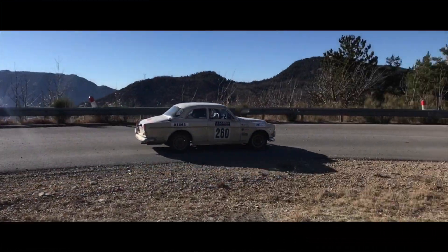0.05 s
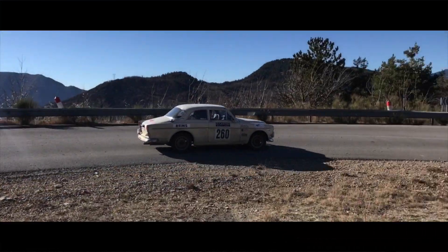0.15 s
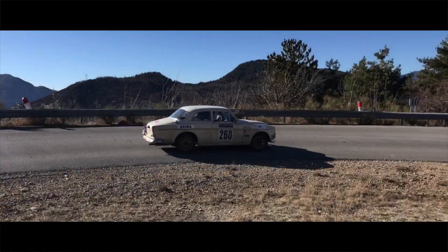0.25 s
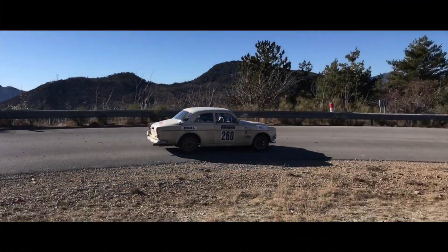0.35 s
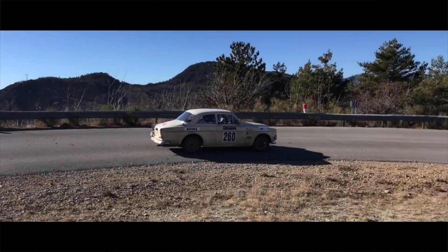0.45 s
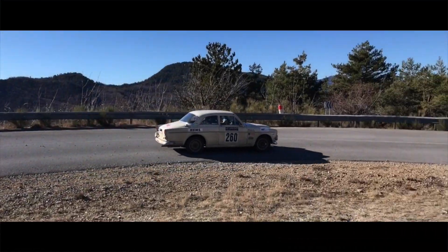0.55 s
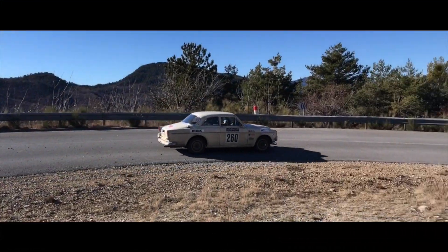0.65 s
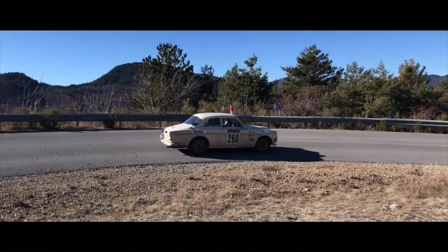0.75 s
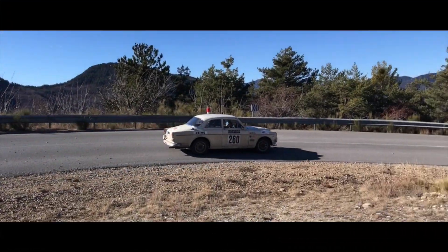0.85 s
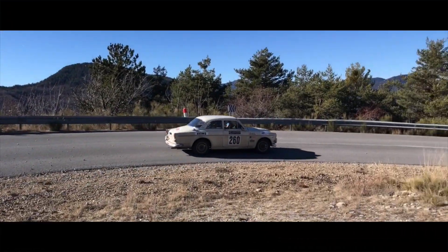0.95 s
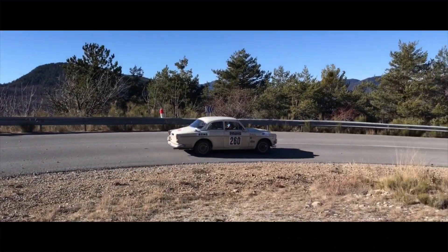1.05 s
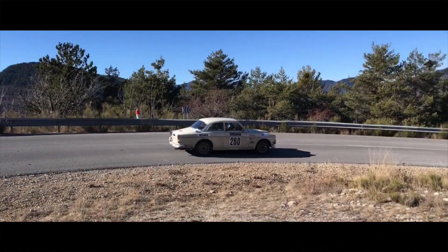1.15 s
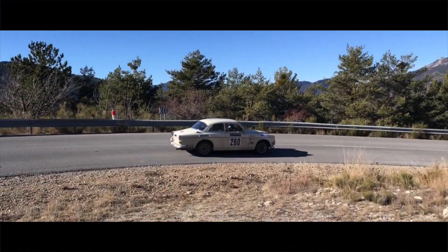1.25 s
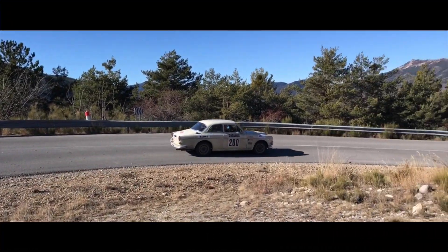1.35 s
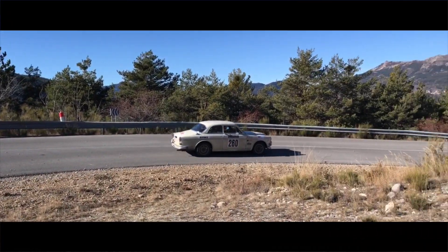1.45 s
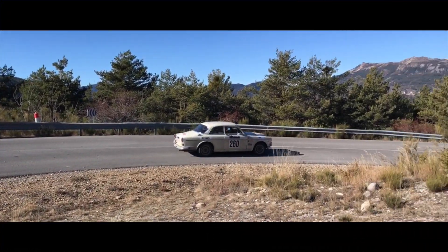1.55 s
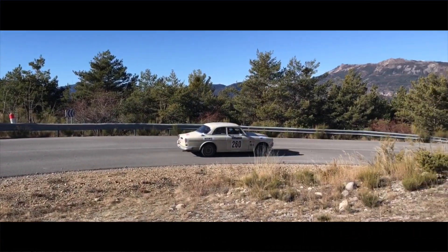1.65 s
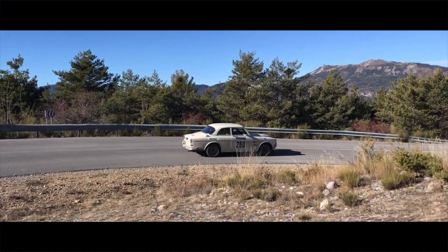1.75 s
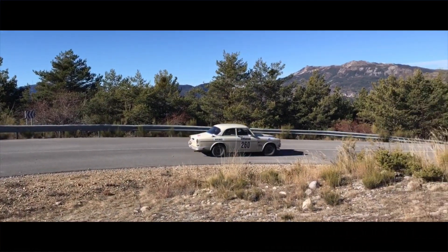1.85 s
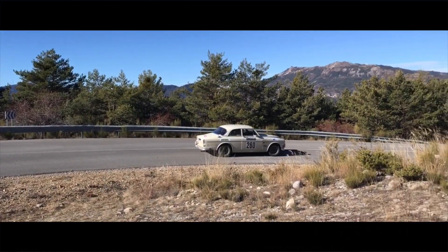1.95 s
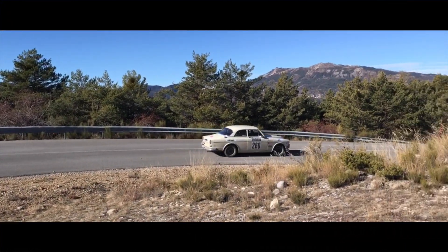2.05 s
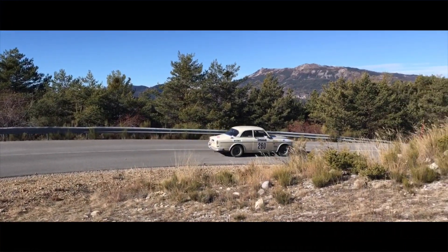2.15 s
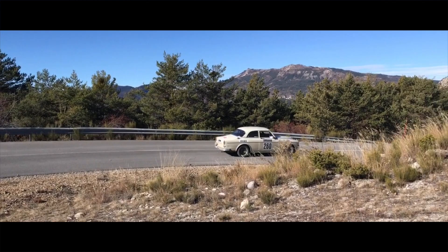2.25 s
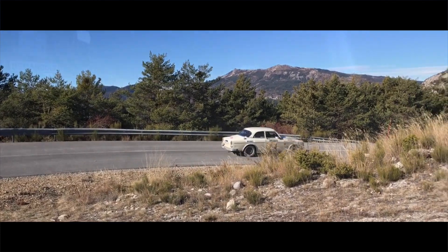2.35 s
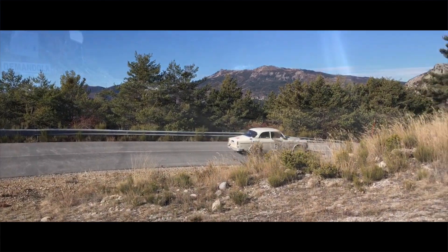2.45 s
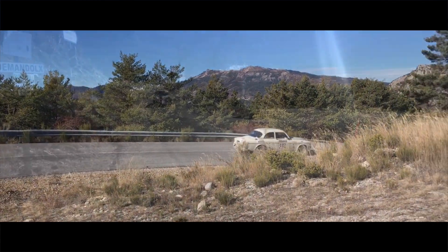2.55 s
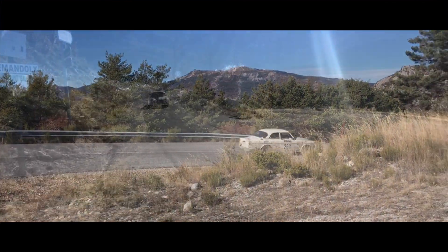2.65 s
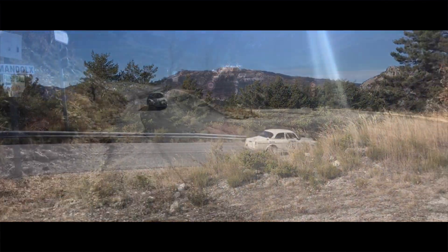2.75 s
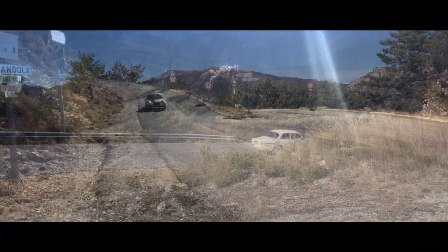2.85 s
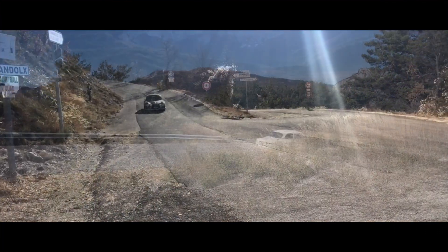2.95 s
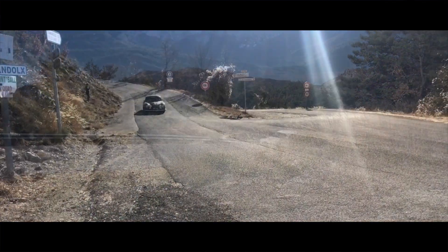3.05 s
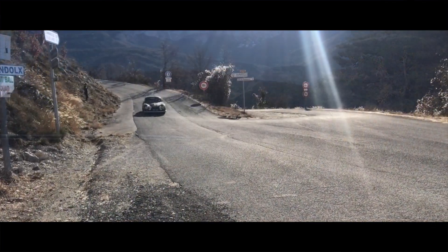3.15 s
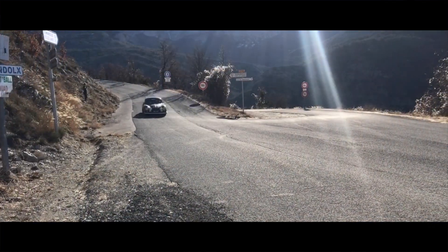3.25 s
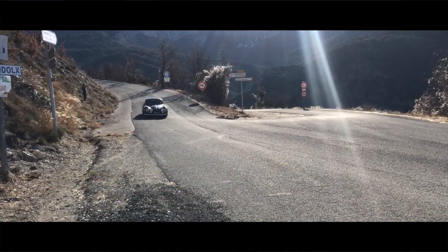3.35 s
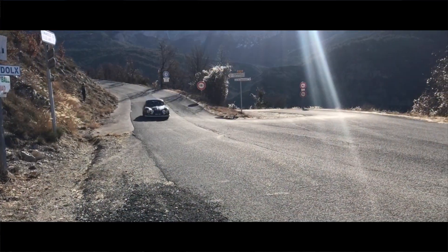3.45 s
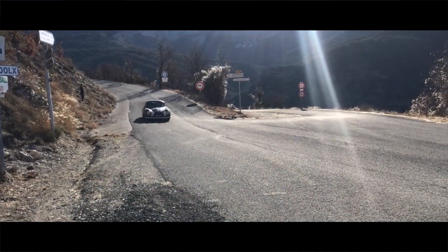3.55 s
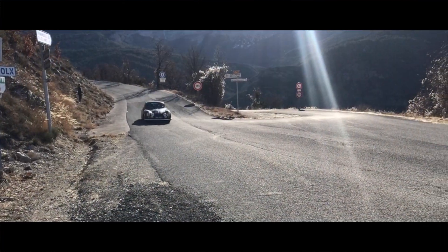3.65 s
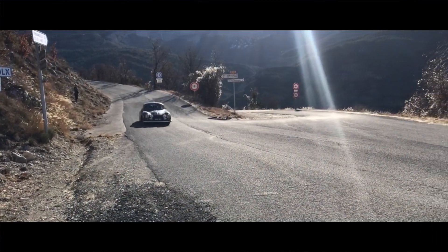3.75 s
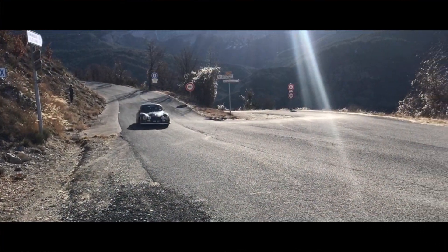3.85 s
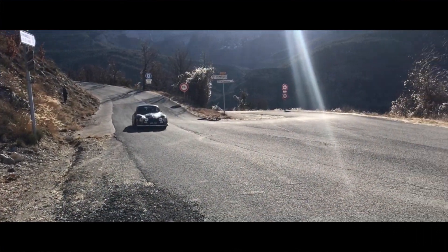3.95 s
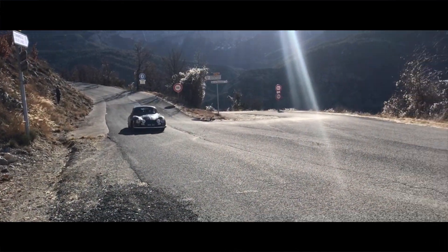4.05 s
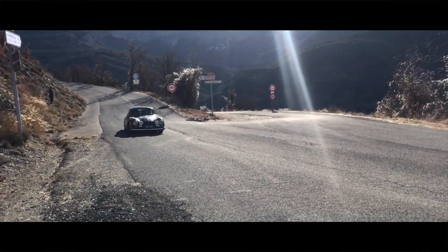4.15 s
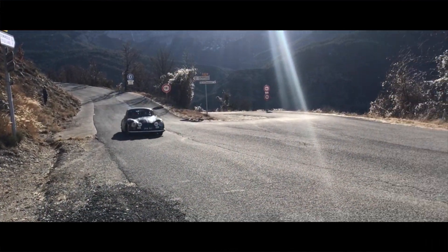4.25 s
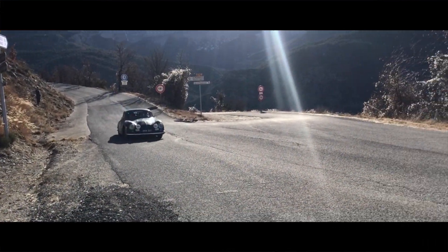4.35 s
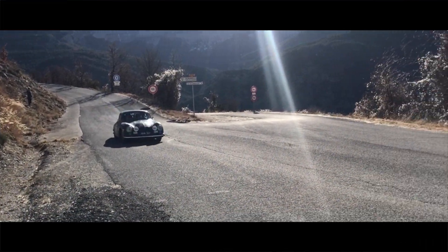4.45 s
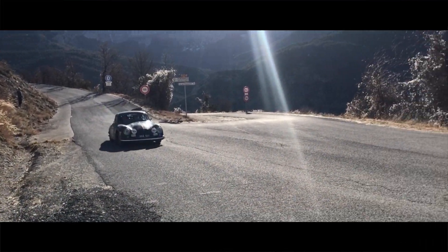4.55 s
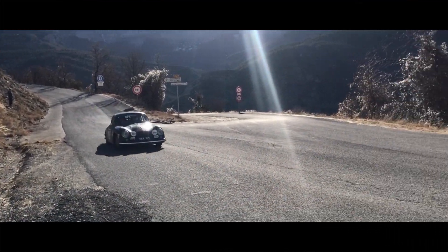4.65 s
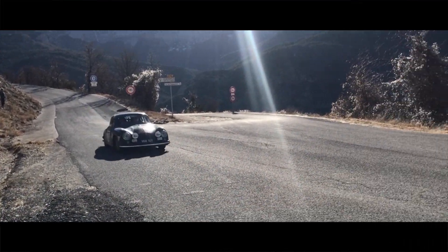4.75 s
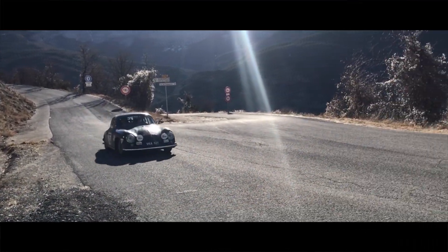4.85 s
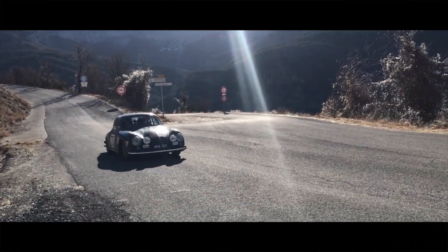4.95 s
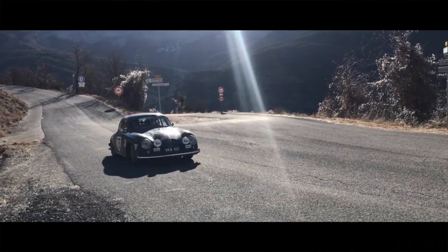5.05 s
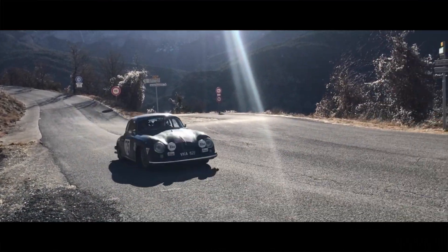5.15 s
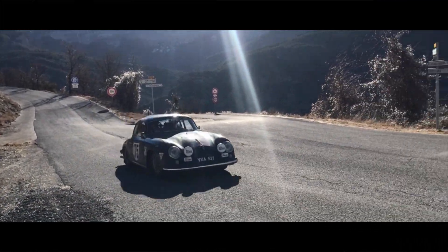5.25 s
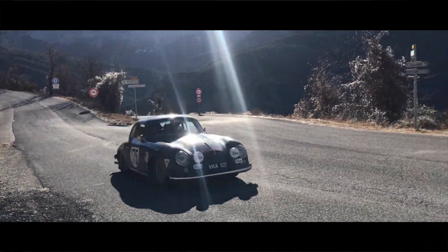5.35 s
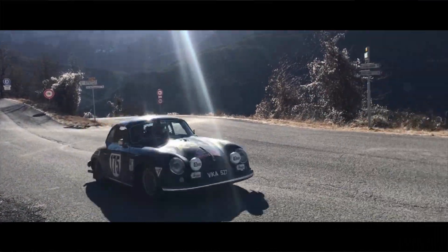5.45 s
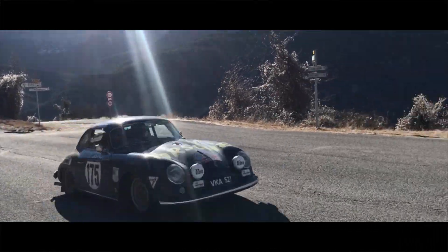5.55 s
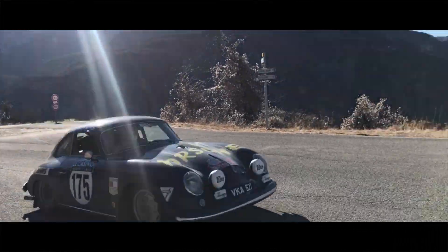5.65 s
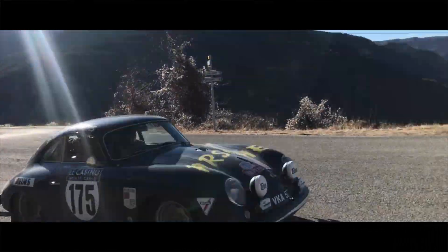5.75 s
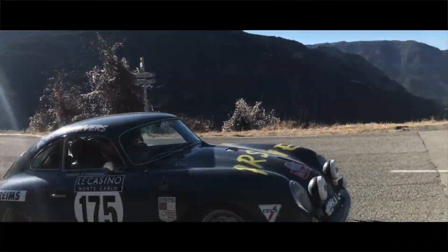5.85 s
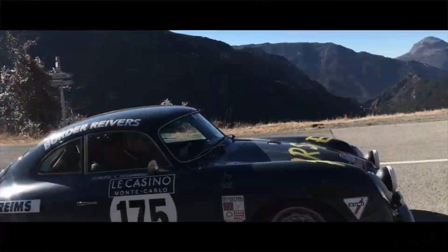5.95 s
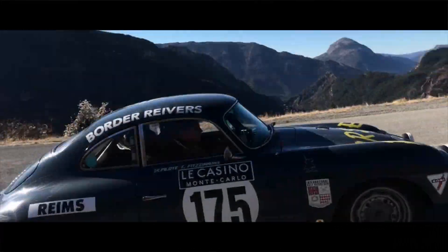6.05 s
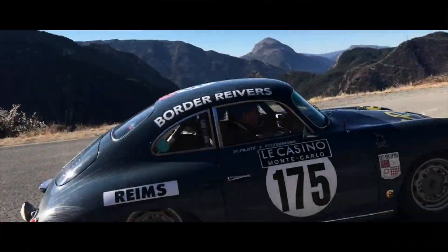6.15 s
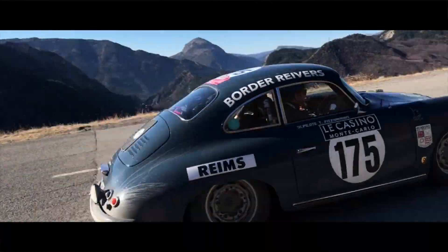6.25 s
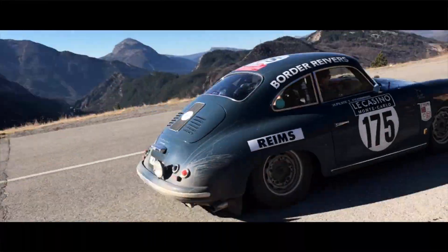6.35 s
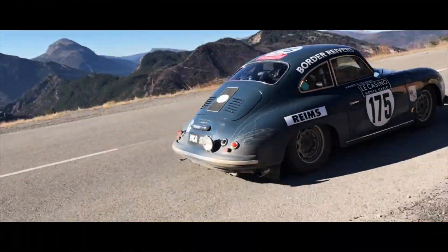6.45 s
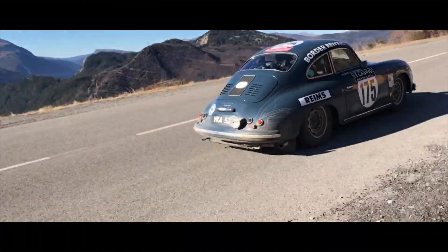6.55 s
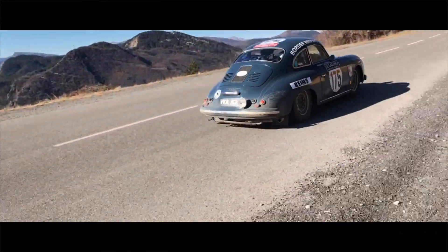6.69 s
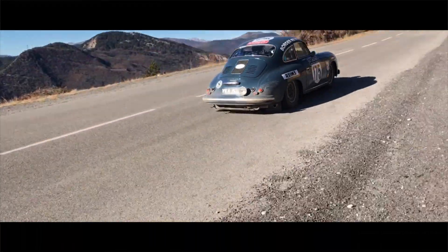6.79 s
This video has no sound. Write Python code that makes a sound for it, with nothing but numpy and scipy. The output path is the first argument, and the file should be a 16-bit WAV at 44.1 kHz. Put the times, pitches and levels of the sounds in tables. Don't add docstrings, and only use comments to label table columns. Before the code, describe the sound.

Open mountain roadside, mono phone microphone with softened treble. At 0 s a handling knock and gritty crunch sit over a close old four-cylinder engine, a deep boom around 60 Hz with rumbling tyres. Dull stone taps strike at 0.1, 0.2, 0.37 and 0.5 s; the engine stumbles with low, rising burbles until about 1.1 s. It then pulls steadily, pitch creeping up, with thin high squeaks, and fades from 2.1 to 3 s, a tiny brake squeal near 2.5. A second car coasts faintly at a lower rate, blips its throttle upward at 3.7-3.95 s, then drones steadily. Dry grit snaps, thickest at 4.1-4.45 s. A short intake hoot comes at 5.1 s. The car swells to a loud pass around 5.9-6.2 s, tyres roaring, gear whine sinking slightly, then departs with pulsing, hollow tailpipe rasp, still audible when it stops at 6.8 s.

```python
import sys
import numpy as np
from scipy import signal
from scipy.fft import rfft, irfft, next_fast_len
from scipy.io import wavfile
from scipy.ndimage import uniform_filter1d

SR = 44100
rng = np.random.default_rng(int(sys.argv[2]) if len(sys.argv) > 2 else 0)


def log_audio(samples):
    frames = np.atleast_2d(samples).T
    limited = np.clip(frames, -1, 1)
    pcm = np.round(limited * 32767).astype(np.int16)
    wavfile.write(sys.argv[1], SR, pcm)


def gain_from_decibels(decibels):
    exponent = np.asarray(decibels, float) / 20
    return 10 ** exponent


N = 300762
PADDED = next_fast_len(N)

# frequency in Hz, density in dB per Hz.
RUMBLE_COLOUR = [(20, -18.5), (40, 1.5), (90, -4.5), (150, -12), (200, -10), (265, -20), (340, -13),
                 (420, -22.5), (520, -62.5)]
# frequency in Hz, density in dB per Hz.
TYRE_COLOURS = [
    [(250, -37), (420, 1.5), (842, 1.8), (950, -0.5), (1090, 0), (1520, -10), (2500, -10.5), (3540, -14.5),
     (4780, -27), (5570, -17.5), (10300, -18.5), (13000, -16.5), (15600, -33.5)],
    [(250, -7), (420, -6.5), (543, -5.5), (735, -3), (1050, -7), (1500, -10.5), (1900, -11), (2860, -16.5),
     (4240, -29.5), (4930, -39), (11500, -39.5), (15600, -42)],
    [(250, -12), (420, -0.5), (543, -10), (735, -3.5), (1390, -12.5), (1560, -14), (2050, -17), (2860, -19),
     (4240, -25.5), (4930, -35.5), (11500, -32), (15600, -36)],
    [(250, -26), (420, 2), (446, 2), (467, 4), (577, -1.5), (702, -0.5), (1020, -1), (1250, -5),
     (1450, -11.5), (1790, -15), (2700, -17), (3400, -20.5), (5910, -35), (9030, -32.5), (10500, -32),
     (11700, -32), (13000, -39), (15600, -41)],
    [(250, -38), (420, -18), (671, 7), (792, 6), (936, 11), (1320, -2), (1470, -7.5), (3090, -14),
     (5570, -34), (8630, -22), (10300, -36), (13000, -28), (15600, -32)],
]
# time in seconds, view (0 far, 1 descent, 2 passing, 3 leaving).
ROAD_VIEW = [(3.55, 0), (3.95, 1), (4.3, 1), (5.3, 2), (6.3, 2), (6.45, 3)]
# time in seconds, rumble over roar in dB, rasp depth from 0 to 1.
RUMBLE_AND_RASP = [(0, 12, .2), (.4, 8, .2), (.7, -8, .2), (1.05, 11, .2), (1.3, 5, .2), (2.65, 0, .2),
                   (3.0, 11, .1), (3.9, 10, .13), (4.4, 6, .15), (5.8, 6, .25), (6.35, 5, .3),
                   (6.55, 3, .65)]
# time in seconds, level in dB.
SALOON_NEARNESS = [(0, 3.5), (.1, -1.5), (.9, -2), (1.6, -3), (2.12, -4), (2.25, -7.5), (2.38, -13),
                   (2.58, -20), (3.1, -38)]
# time in seconds, level in dB.
COUPE_NEARNESS = [(2.4, -58), (2.8, -30), (3.25, -21), (4.3, -14), (5.0, -9.5), (5.4, -5), (5.85, -0.5),
                  (6.25, -2.5), (6.82, -6.5)]
# change of roar, whoosh and hiss in dB per dB of nearness.
AIR_FOLLOW = [
    (.5, 0.91, 0.69),
    (1.2, 1.023, 1.53),
]
# roar in dB, whoosh in dB, hiss in dB.
SALOON_NOISE_DB = [
    (-47, -41.5, -55.5),
    (-44.5, -46, -56),
    (-44, -45, -57),
]
# roar in dB, whoosh in dB, hiss in dB.
COUPE_NOISE_DB = [
    (-28.5, -35.5, -47),
    (-28, -34, -46.5),
    (-28.5, -35.5, -45.5),
    (-30.5, -35, -40.5),
    (-43, -32, -42.5),
]
# gain of roar, whoosh and hiss in dB per unit of rasp.
RASP_LIFT_DB = (8, -2, 7.5)
# roar in dB, whoosh in dB, hiss in dB.
VALLEY_DB = (-50.5, -75, -74)
# time in seconds, frequency in Hz, depth from 0 to 1.
ASPHALT_DIP = [(6.3, 900, 0), (6.45, 999, 0.6), (6.57, 1170, .75), (6.7, 1310, .6), (6.82, 1370, .5)]

# start in seconds, end in seconds, frequency in Hz, width in Hz, level in dB, flicker in
# dB.
ROAR_SWELLS = [(0.88, 2.14, 823, 89, -51.5, 1.4), (1.9, 2.75, 600, 85, -56.5, 1.5),
               (2.95, 3.64, 1047, 104, -55, 1.5), (3.5, 3.7, 1850, 188, -66, 1.5),
               (3.1, 3.55, 327, 48, -48.5, 2.3), (3.85, 4.1, 3000, 300, -58, 1.5),
               (4.05, 4.3, 357, 13, -42.5, 1.5), (6.0, 6.55, 3214, 1200, -48, 2.5),
               (6.05, 6.55, 1225, 160, -43.5, 2.3), (.05, .9, 1350, 230, -56, 1.5),
               (6.3, 6.8, 5300, 990, -57, 1.5), (4.4, 6, 810, 130, -50, 1.5),
               (5.75, 6.55, 2940, 1000, -44, 2.8), (5.68, 6.18, 1120, 200, -41.5, 2.3),
               (6.35, 6.82, 480, 150, -46, 2), (3.55, 3.95, 335, 24, -49, 2), (3.6, 3.95, 435, 24, -52, 2),
               (6.15, 6.55, 573, 76, -39.5, 2.54), (5.75, 6.3, 11500, 730, -65, 1.45),
               (5.3, 6.2, 12000, 439, -71, 1.5), (1.3, 2.37, 7140, 400, -66, 1.5),
               (1.88, 2.25, 11500, 2500, -60, 1.5), (1.95, 2.2, 6700, 400, -63, 2.5),
               (0, 2.2, 576, 180, -58, 1.5), (6.15, 6.5, 13600, 1600, -57, 1.5),
               (6.1, 6.5, 900, 250, -43, 2), (0.5, 2.3, 14900, 1200, -71, 1.5)]
# start in seconds, end in seconds, frequency in Hz, width in Hz,
# level in dB, flicker in dB.
SQUEAK_BANDS = [
    (1.2, 2.3, 7430, 200, -70, 3),
    (1.0, 2.3, 13350, 160, -68.5, 3),
    (.1, 1.6, 5600, 400, -66, 3),
]
# time in seconds, frequency in Hz, level in dB.
BRAKE_SQUEAL = [
    (2.3, 4890, -90),
    (2.4, 4900, -79.5),
    (2.52, 4750, -77),
    (2.62, 4760, -97),
]
# time in seconds, frequency in Hz, level in dB.
GEAR_WHINE = [
    (5.5, 577, -58),
    (5.7, 567.3, -43),
    (5.9, 561, -45),
    (6.15, 549, -44),
    (6.35, 539, -44),
    (6.55, 533.6, -58),
]
# time in seconds, frequency in Hz, level in dB.
INTAKE_HOOT = [
    (5.03, 212.3, -32),
    (5.07, 250, -31),
    (5.1, 278.2, -26.5),
    (5.14, 291.3, -29.5),
    (5.18, 275, -31.5),
    (5.23, 250, -33),
]

# time in seconds, peak below 8 kHz in dB, peak above in dB.
GRIT_TICKS = [(0.0184, -40, -41), (0.2424, -45, -52), (0.2844, -38, -59), (2.6031, -64, -55),
              (2.632, -62, -53), (2.677, -64, -59), (2.9762, -64, -59), (3.5145, -55, -66),
              (3.405, -58, -68), (3.415, -60, -69), (4.2225, -46, -46), (4.2405, -48, -50),
              (4.2655, -44, -50), (4.3182, -50, -50), (4.326, -52, -52), (4.347, -53, -60),
              (4.409, -58, -50), (2.757, -48, -43), (3.088, -44, -49), (3.1323, -51, -63),
              (3.3777, -56, -69), (3.53, -43, -66), (3.5577, -37, -51), (3.5923, -43, -60),
              (3.8202, -49, -64.5), (3.8457, -60, -46.5), (4.1404, -54, -45), (4.2183, -48, -48),
              (4.2308, -43, -41), (4.2514, -35, -31), (4.2614, -48, -50), (4.3704, -61, -59),
              (4.4032, -39, -30), (4.4128, -43, -50), (4.4234, -55, -56), (4.7122, -41, -54),
              (6.3384, -41, -28)]
# time in seconds, length in seconds, level in dB.
GRIT_CRUNCHES = [(0.01, 0.026, -43.5), (0.558, .015, -64), (0.591, 0.027, -43), (3.395, .03, -68.5),
                 (3.765, .025, -68), (3.838, .015, -55.5), (4.158, 0.097, -60), (4.211, 0.022, -53),
                 (4.238, 0.033, -52), (4.225, 0.065, -60), (4.315, .016, -58), (4.4, 0.017, -62),
                 (6.335, 0.015, -43)]
# time in seconds, peak in dB, ring in Hz.
STONE_HITS = [
    (0.108, -17.5, 1100),
    (0.192, -29, 1250),
    (0.372, -13, 1100),
    (0.513, -15, 1340),
    (1.165, -32, 853),
]
# time in seconds, level in dB.
HOUSING_KNOCKS = [
    (0.0195, -9),
    (0.0212, 2.5),
    (0.036, -8.5),
    (0.06, -15),
]
# frequency in Hz, level in dB, 60 dB decay in seconds.
HOUSING_MODES = [
    (132, 2, 0.013),
    (250, -23, 0.02),
    (370, -21, 0.034),
    (596, -16.5, 0.023),
    (780, -19.5, 0.028),
    (1170, -27.5, 0.025),
    (2830, -27, 0.0065),
]

# time in seconds, peak in dB, start in Hz, end in Hz, length in seconds.
LATE_BURNS = [
    (.03, -22, 45, 80, .08),
    (.47, -27, 40, 50, .08),
    (.6, -28, 65, 95, .09),
    (.75, -20, 62, 125, .07),
    (.8, -25, 115, 175, .09),
    (.865, -16.5, 55, 130, .08),
    (1.03, -17.5, 62, 125, .08),
    (3.82, -33, 28, 33, .35),
    (3.95, -31, 62, 50, .25),
    (4.21, -33, 55, 27, .14),
]
# time in seconds, loss of firing tone in dB.
WEAK_FIRINGS = [(.3, 2), (.49, 3), (.66, 1.5), (.79, 4.5), (.91, 4.5), (1.08, 4), (3.85, 3), (4.1, 3),
                (4.5, 3.5), (4.78, 9), (5.25, 1), (5.45, 5)]
# frequency in Hz, width in Hz, level in dB.
PIPE_MODES = [
    (760, 170, 2),
    (1050, 220, -3),
]
CYLINDER_LEVELS = [
    (0, -10, -9, -11),
    (-5, 0, -5, -3),
]
# time in seconds, firing tone in dB, effort as overtones over the tone in dB.
SALOON_EFFORT = [(0, -19, -6.5), (.2, -14.5, -16), (.6, -15, -14.5), (.85, -15, -13), (1.05, -13, -13),
                 (1.3, -14, -9), (2.201, -14.5, -10.5), (2.72, -19.5, -10.5), (3.1, -32, -12.5)]
# time in seconds, firing rate in Hz.
SALOON_FIRING = [(0, 60.9), (.6, 58.93), (1.15, 59.3), (1.5, 61.56), (2.0, 63.5), (2.72, 67.7),
                 (3.17, 69.7)]
# time in seconds, load (0 light, 1 pulling, 2 behind the bank), unevenness in dB.
SALOON_STATE = [(0, 0, 2.2), (.8, .1, 3.2), (1.1, .45, 2.6), (1.3, 1, .7), (2.15, 1, .8), (2.5, 2, 1),
                (3.2, 2, 2.5)]
# time in seconds, firing tone in dB, overtones over the tone in dB.
COASTING_EFFORT = [(2.499, -41, -9), (2.9, -37.5, 1.5), (3.1, -38, 6), (3.5, -37, 5), (3.65, -34, 4),
                   (3.78, -38, -8), (3.87, -46, .1)]
# time in seconds, firing rate in Hz.
COASTING_FIRING = [(2.5, 39.1), (2.9, 39.64), (3.2, 40.1), (3.45, 38.3), (3.62, 38.3), (3.85, 39.6)]
# time in seconds, firing tone in dB, overtones over the tone in dB.
COUPE_EFFORT = [(3.72, -28.5, -24), (4.0, -26.5, -22), (4.4, -23, -13.5), (4.66, -18, -14),
                (5.1, -16, -9.5), (5.35, -15, -8.5), (5.88, -9.5, -7), (6.08, -9.5, -6.5),
                (6.82, -15.5, -8)]
# time in seconds, firing rate in Hz.
COUPE_FIRING = [(3.7, 40.13), (3.8, 50.7), (3.93, 70.35), (4.2, 67.87), (4.5, 68.5), (4.7, 69.82),
                (5.1, 70.63), (5.55, 72.72), (6.0, 73.9), (6.3, 72.77), (6.82, 72.25)]
# time in seconds, side heard (0 distant, 1 far, 2 front, 3 alongside, 4 tailpipe),
# unevenness in dB.
COUPE_STATE = [(3.7, 0, 3), (4.4, 0, 1.5), (4.6, 0, 1.5), (4.9, 1, 2), (5.3, 2, 2), (5.7, 2, 1.5),
               (5.95, 3, 1), (6.1, 3, 1), (6.3, 4, 1.3), (6.82, 4, 1.3)]
# level in dB at .5, .75, 1, .. times the firing rate.
SALOON_EXHAUST = [
    [-37, -14.5, 0, -17, -22.5, -37, -19, -18.5, -31, -32, -32, -36, -34.5, -38.5, -38.5, -42, -36, -46,
     -50, -46, -48, -37, -42.5, -42],
    [-42, -28, 0, -41, -24.5, -31, -13.5, -34.5, -45, -37, -22, -40, -36.5, -37.5, -28.5, -51, -37, -54,
     -35.5, -42, -43, -47, -38, -60],
    [-31.5, -23, 0, -28, -22, -34, -14.5, -32, -34, -38, -23.5, -35.5, -38, -43, -29, -47, -47, -49, -41,
     -46.5, -45.5, -46.5, -52, -54],
]
COASTING_EXHAUST = [
    [-46, -28, 0, -23.5, -5.5, -21, 0, -23, -31, -29, -22.5, -28, -35, -26, -23.5],
]
COUPE_EXHAUST = [
    [-20, -28, 0, -16, -17, -22, -14.5, -25.5, -27, -20.5, -16.5, -29, -26, -32, -28, -37, -43, -43, -26.5,
     -33, -33, -50, -29, -47, -53, -47, -45, -34, -49, -43, -55, -51, -50, -38, -33, -48, -52, -42, -51],
    [-18, -33, 0, -28, -33, -18, -13.5, -17.5, -13.5, -15, -20, -15, -24, -32, -26.5, -39, -44, -47, -27,
     -29.5, -31, -54, -37, -48, -55, -47, -42, -30, -50, -45, -58, -52, -51, -40, -26.5, -49, -53, -42, -52],
    [-23, -36, 0, -38, -29, -23, -11.3, -17.5, -26, -10, -20.5, -29, -25.5, -30, -24.5, -52, -53, -31.5,
     -25, -28.5, -40, -25, -32, -31, -29, -31, -52, -45, -39, -42, -26, -52, -58, -49, -26, -56, -54, -50,
     -54],
    [-23, -38, 0, -34, -25, -23, -11, -42, -37, -8.5, -18.5, -13, -42, -26, -18, -52, -44, -24, -25.5, -46,
     -48, -46, -31, -27.5, -44, -35, -36, -38, -24.5, -34, -26, -41, -46, -29, -47, -52, -28, -54, -51],
    [-19, -35, 0, -34, -20.5, -31, -12.5, -36, -22, -9, -16, -25, -32, -25.5, -18, -24, -30, -35, -15.5,
     -28, -36, -37, -37, -37, -34, -32, -33, -32.5, -32, -38, -36, -54, -49, -31, -36, -29.5, -52, -29, -40],]

RASP_FROM = .3


def rms_one(x):
    return x / np.sqrt(np.mean(x ** 2) + 1e-20)


def in_time(rows):
    s, *columns = np.transpose(rows)
    return [np.interp(np.arange(N) / SR, s, column) for column in columns]


def drift(rate, size=N):
    r = np.exp(-80 * np.pi * rate / SR)
    slow = signal.lfilter([1], [1, -2 * r, r * r], rng.standard_normal(size // 40 + 2002))[2000:]
    return np.interp(np.arange(size) / 40, np.arange(len(slow)), rms_one(slow))


def bandpass(order, edges, x):
    return signal.sosfilt(signal.butter(order, edges, "band", fs=SR, output="sos"), x)


def coloured(colour):
    hz, db = np.transpose(colour)
    grid = np.fft.rfftfreq(PADDED, 1 / SR) + 1
    noise = rfft(rng.standard_normal(PADDED))
    level_db = np.interp(np.log(grid), np.log(hz), db, left=-120, right=-120)
    ripple_db = .8 * drift(36, size=len(grid))
    return noise * gain_from_decibels(level_db + ripple_db)


def layer_db(near, state, rows, follow):
    place, nearness_db = in_time(state)[0], in_time(near)[0]
    return np.array([np.interp(place, np.arange(len(rows)), db) + k * nearness_db
                     for db, k in zip(np.transpose(rows), follow)])


def firing_puff(depth, phase):
    phase = phase - .47
    beat = depth * (1.25 * np.cos(phase) + .55 * np.cos(phase / 4))
    return np.exp(beat) / np.sqrt(uniform_filter1d(np.exp(2 * beat), size=SR // 9))


def road(saloon_phase, coupe_phase):
    rumble_db, rasp = in_time(RUMBLE_AND_RASP)
    t = np.arange(N) / SR
    view, = in_time(ROAD_VIEW)
    first = gain_from_decibels(layer_db(SALOON_NEARNESS, SALOON_STATE, SALOON_NOISE_DB, AIR_FOLLOW[0]))
    second_db = layer_db(COUPE_NEARNESS, COUPE_STATE, COUPE_NOISE_DB, AIR_FOLLOW[1])
    second = gain_from_decibels(second_db + np.outer(RASP_LIFT_DB, np.maximum(rasp - RASP_FROM, 0)))
    valley = np.outer(gain_from_decibels(VALLEY_DB), np.interp(t, [2.58, 2.94], [0, 1]))
    second = np.hypot(second, valley)
    gains = [first] + [second * np.sqrt(np.clip(1 - np.abs(view - k), 0, 1)) for k in range(4)]
    phase = np.where(t < 2.7, saloon_phase, coupe_phase)

    gust = drift(10.0)
    rumble_level = np.hypot(first[0], second[0]) * gain_from_decibels(rumble_db + drift(15.0))
    out = rumble_level * rms_one(irfft(coloured(RUMBLE_COLOUR), PADDED)[:N])

    colours = [coloured(colour) for colour in TYRE_COLOURS]
    grid = np.fft.rfftfreq(PADDED, 1 / SR) + 1
    below_1500, below_4600 = [1 / (1 + (grid / hz) ** 8) for hz in (1500, 4600)]
    bands = below_1500, below_4600 - below_1500, 1 - below_4600
    puffs = np.minimum(rasp, .38), .1, .1
    for layer, (band, puff, gust_db) in enumerate(zip(bands, puffs, (.9, .5, .7))):
        noise = sum(gain[layer] * rms_one(irfft(colour * np.sqrt(band), PADDED)[:N])
                    for gain, colour in zip(gains, colours))
        gusts = gain_from_decibels(gust_db * (0.3 * gust + drift(22.0)))
        out += gusts * firing_puff(puff, phase) * noise
    return out


def ground_dip(x):
    hz, depth = in_time(ASPHALT_DIP)
    turn = np.exp(2j * np.pi * np.cumsum(hz) / SR)
    half_width = signal.butter(1, 60, fs=SR, output="sos")
    band = signal.sosfiltfilt(half_width, x / turn) * turn
    return x - 2 * np.clip(depth, 0, 1) * band.real


def flickering_bands(rows):
    out = np.zeros(N)
    for start, end, hz, width_hz, db, flicker_db in rows:
        t = np.arange(round((end - start) * SR)) / SR
        swell = np.clip(np.minimum(t, t[::-1]) / 0.14, 0, 1)
        noise = rng.standard_normal(3 * SR)[:len(t)]
        flicker = drift(13.0, size=3 * SR)[:len(t)]
        narrow = bandpass(2, [hz - width_hz / 2, hz + width_hz / 2], noise)
        out[round(start * SR):][:len(t)] += swell * gain_from_decibels(db + flicker_db * flicker) * rms_one(narrow)
    return out


def glide(rows):
    hz, db = in_time(rows)
    t = np.arange(N) / SR
    edge = np.clip(np.minimum(t - rows[0][0], rows[-1][0] - t) / 0.016, 0, 1)
    return edge * gain_from_decibels(db) * np.sqrt(2) * np.sin(2 * np.pi * np.cumsum(hz) / SR)


def ring(at_s, db, hz, t60):
    out, start = np.zeros(N), round(at_s * SR)
    t = np.arange(min(round(t60 * SR) + 8, N - start)) / SR
    out[start:start + len(t)] = gain_from_decibels(db - 60 * t / t60) * np.sin(2 * np.pi * hz * t)
    return out


def scuffs(hits):
    out = np.zeros(N)
    t = np.arange(SR // 16) / SR
    for s, db in hits:
        decay = gain_from_decibels(db - 23 - 60 * t / 0.046)
        out[round((s - .004) * SR):][:len(t)] += decay * np.minimum(t / .004, 1) * 2 * rng.standard_normal(len(t))
    return out


def soft_contact(x):
    return bandpass(1, [500, 3200], x)


def knocks():
    rings = sum(ring(s, db + blow_db, hz, t60) for s, blow_db in HOUSING_KNOCKS for hz, db, t60 in HOUSING_MODES)
    return soft_contact(scuffs([(s, db - 12.5) for s, db in HOUSING_KNOCKS])) - rings


def stones():
    taps = scuffs([row[:2] for row in STONE_HITS])
    for s, db, hz in STONE_HITS:
        taps += ring(s, db - 11, hz, .018) + ring(s + 2 / hz, db - 13, hz, .014)
        taps += ring(s - .002, db - 19, 1880, .022)
        taps += ring(s, db - 18, hz * .66, .02) + ring(s, db - 20, hz * 2.4, .012)
    return soft_contact(taps)


def grit():
    out = np.zeros(N)
    n = np.arange(260)
    for s, dull_db, bright_db in GRIT_TICKS:
        snap = (n == 0) + 0.59 * rng.standard_normal(260) * gain_from_decibels(-60 * n / SR / 0.005)
        for db, edges in ((dull_db, (4300, 8000)), (bright_db + 2, (7500, 14500))):
            part = bandpass(2, edges, snap)
            out[round(s * SR):][:260] += gain_from_decibels(db) * part / np.abs(part).max()
    for s, length, db in GRIT_CRUNCHES:
        n = round(length * SR)
        grains = (rng.random(n) < .12) * rng.standard_normal(n) * gain_from_decibels(2.0 * rng.exponential(1, n))
        crisp = rms_one(bandpass(2, (5000, 14500), grains))
        out[round(s * SR):][:n] += gain_from_decibels(db) * crisp * np.hanning(n) ** .5
    return out


def tailpipe(phase):
    loud_phase = phase[round(6.6615 * SR)]
    firing = ((phase - loud_phase) // (2 * np.pi)).astype(int)
    cracks = np.diff(firing, prepend=firing[0]) * gain_from_decibels(1.9 * rng.standard_normal(N))
    pipe = np.zeros(N)
    for (hz, width_hz, db), by_cylinder in zip(PIPE_MODES, CYLINDER_LEVELS):
        blows = cracks * gain_from_decibels(db + np.take(by_cylinder, firing % 4))
        pipe += signal.lfilter(*signal.iirpeak(hz, hz / width_hz, fs=SR), blows)
    pipe = bandpass(2, [600, 1250], pipe)
    return gain_from_decibels(-28) * np.maximum(in_time(RUMBLE_AND_RASP)[1] - RASP_FROM, 0) * rms_one(pipe)


def stumbles():
    out = np.zeros(N)
    for s, db, from_hz, to_hz, length in LATE_BURNS:
        t = np.arange(round(length * SR)) / SR
        swell = gain_from_decibels(db) * np.sin(np.pi * t / length) ** 2
        cycles = from_hz * t + (to_hz - from_hz) * t ** 2 / (2 * length)
        out[round(s * SR):][:len(t)] += swell * np.sin(2 * np.pi * cycles)
    return out


def falter_db():
    t = np.arange(N) / SR
    return sum(loss_db * np.exp(-((t - s) / 0.056) ** 2) for s, loss_db in WEAK_FIRINGS)


def engine(revs, levels, state, tables, fade_s):
    phase = 2 * np.pi * np.cumsum(in_time(revs)[0]) / SR
    on = slice(round(levels[0][0] * SR), round(levels[-1][0] * SR))
    tone_db, over_db, mix, uneven_db = [c[on] for c in in_time(levels) + in_time(state)]
    loss_db = falter_db()[on]
    lump = uneven_db * drift(17.5, size=len(mix))
    phase[on] += .025 * uneven_db * drift(10, size=len(mix))
    others, power = 0, 0
    for step, order_db in enumerate(zip(*tables)):
        k = (step + 2) / 4
        if k == 1:
            continue
        size = gain_from_decibels(np.interp(mix, np.arange(len(order_db)), order_db))
        lead = rng.uniform(0, 2 * np.pi) * (k % 1 > 0) + np.pi * (k == 3)
        waver = drift(5 + k, size=len(mix)) * (1 if k % 1 else .6)
        sway = 0.19 * max(1, k / 4) * uneven_db * waver[::-1]
        others = others - size * gain_from_decibels(uneven_db * waver) * np.cos(k * phase[on] + lead + sway)
        power = power + (k > 1.6) * size ** 2 / 2
    overtones = gain_from_decibels(tone_db + over_db - .14 * loss_db + .45 * lump) * others / np.sqrt(power)
    tone = gain_from_decibels(tone_db - loss_db + .3 * lump) * np.sqrt(2) * np.cos(phase[on])
    t = np.arange(len(mix)) / SR
    heard = np.clip(np.minimum(t / fade_s[0], t[::-1] / fade_s[1]), 0, 1)
    sound = np.zeros(N)
    sound[on] = heard * (overtones - tone)
    return sound, phase


def scene():
    saloon, saloon_phase = engine(SALOON_FIRING, SALOON_EFFORT, SALOON_STATE, SALOON_EXHAUST, fade_s=(.001, .1))
    coupe, coupe_phase = engine(COUPE_FIRING, COUPE_EFFORT, COUPE_STATE, COUPE_EXHAUST,
                                fade_s=(.06, .001))
    coasting, _ = engine(COASTING_FIRING, COASTING_EFFORT, [(0, 0, 1.4)], COASTING_EXHAUST, fade_s=(.05, .05))
    roadside = road(saloon_phase, coupe_phase) + flickering_bands(SQUEAK_BANDS + ROAR_SWELLS)
    roadside = ground_dip(roadside + tailpipe(coupe_phase))
    tones = glide(INTAKE_HOOT) + glide(BRAKE_SQUEAL) + glide(GEAR_WHINE)
    impacts = knocks() + stones() + grit()
    engines = saloon + coupe + coasting + stumbles()
    return (roadside + tones + impacts + engines)[None]


def low_pass(x):
    return signal.sosfilt(signal.butter(12, 15700, fs=SR, output="sos"), x)


def record(dry):
    x = signal.sosfilt(signal.butter(1, 12, "high", fs=SR, output="sos"), dry)
    x = x - .45 * signal.lfilter(*signal.iirpeak(10400, 9, fs=SR), x)
    x = x / (1 + np.abs(x) ** 6) ** (1 / 6)
    x = signal.sosfilt(signal.cheby2(16, 40, 16100, fs=SR, output="sos"), x)
    return low_pass(x)


dry = scene()
out = record(dry)
log_audio(out)
```